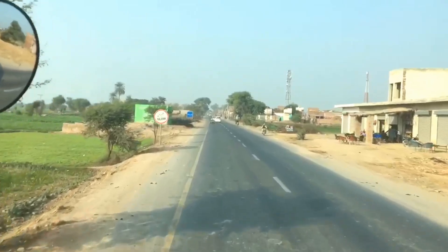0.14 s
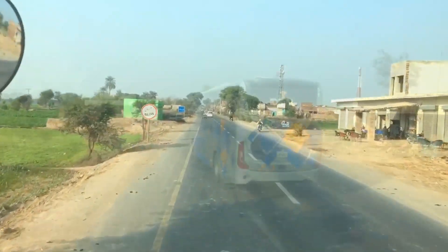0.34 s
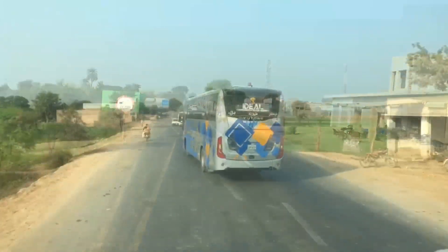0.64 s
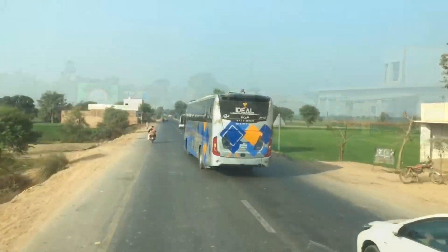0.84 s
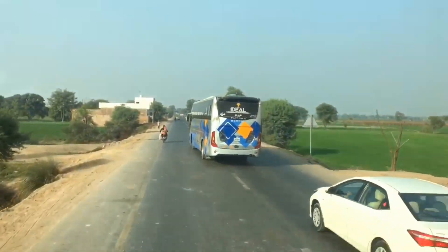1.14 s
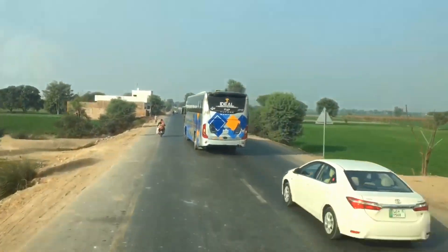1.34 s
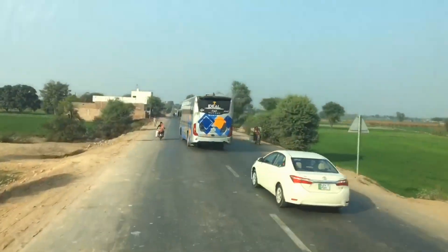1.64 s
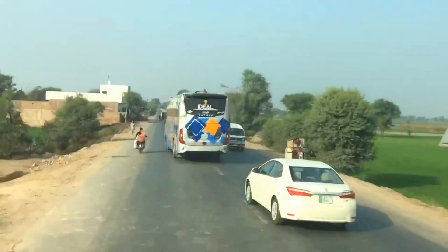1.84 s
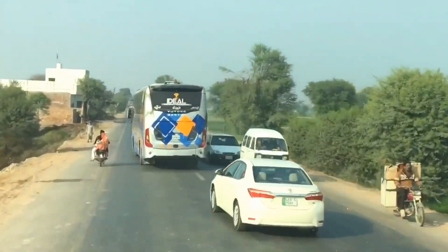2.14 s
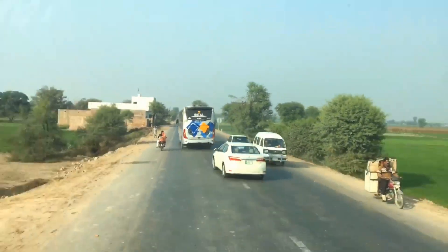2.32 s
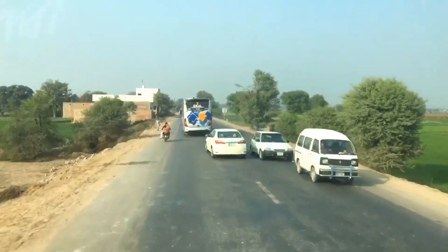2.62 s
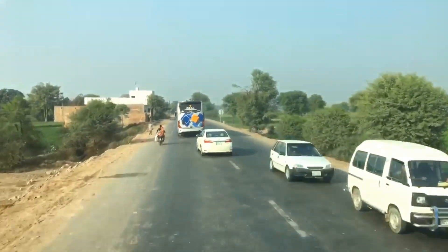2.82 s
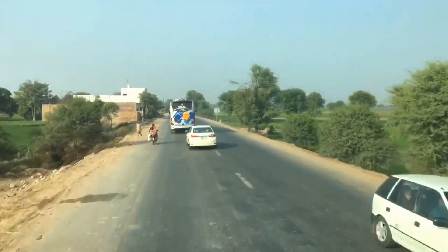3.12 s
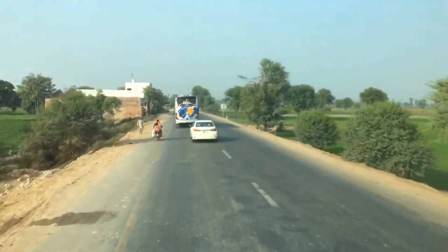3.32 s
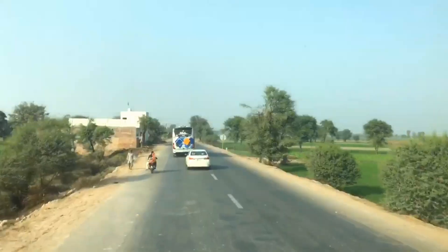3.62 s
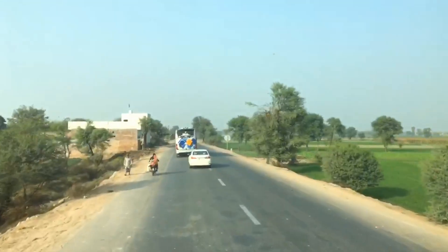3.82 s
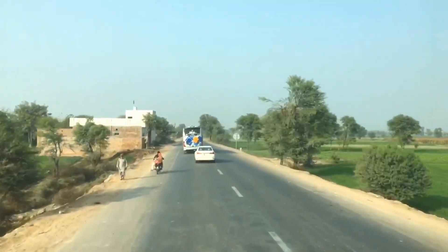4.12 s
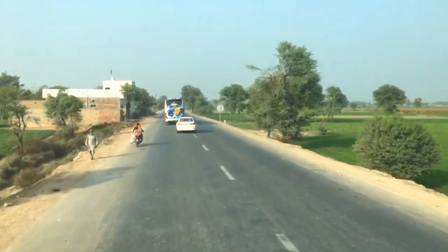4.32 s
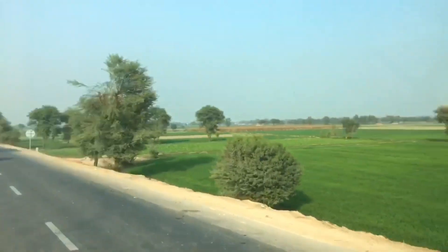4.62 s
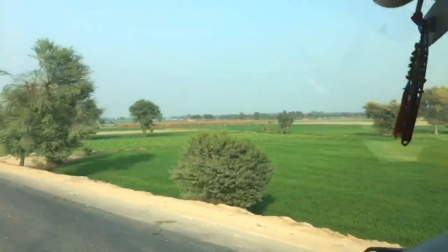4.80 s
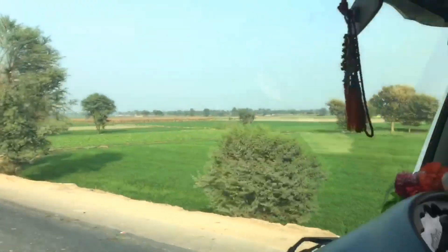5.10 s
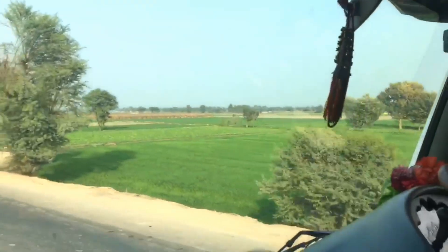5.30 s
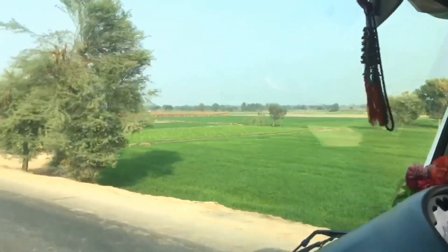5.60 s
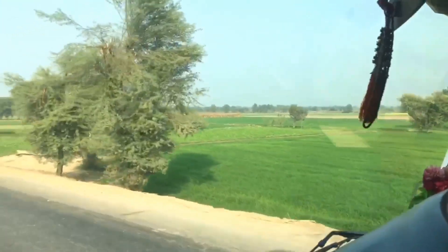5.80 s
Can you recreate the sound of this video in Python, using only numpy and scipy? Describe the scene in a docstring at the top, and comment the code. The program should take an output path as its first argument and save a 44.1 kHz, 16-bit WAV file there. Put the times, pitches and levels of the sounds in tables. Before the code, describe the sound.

A heavy diesel hum fills the cab of a truck on a country road, with the microphone inside. After a second it stops with a click, leaving a coasting engine, tyre rumble and wind while an overtaking car hisses by. The engine pulls again, knocking and setting a loose fitting clacking. Oncoming cars swish past, a rough patch brings more clacks, thuds and small squeaks, and the boom grows under faint ticks.

```python
"""Inside a truck cab on a country road

A six-cylinder diesel booms, hums and knocks over rumbling tyres and hissing wind.
It runs at steady low revs for a second and stops with a click; a second stretch, already fading
in underneath, coasts and then slowly gathers speed. Other cars swish past, bumps thud, the trim
squeaks, and there are faint dry ticks. Engine knocks, and later a rough stretch of road, set a
loose fitting clacking."""
import sys
import numpy as np
from scipy import signal
from scipy.fft import rfft, irfft
from scipy.io import wavfile
from scipy.ndimage import uniform_filter1d

SR = 44100
rng = np.random.default_rng(int(sys.argv[2]) if len(sys.argv) > 2 else 0)


def digitize_waveform(pressure):
    """Quantize a signal to 16-bit integers and store it at the path in sys.argv[1].

    Rows of a 2-D input are taken as channels; values are limited to [-1, 1].
    """
    field = np.atleast_2d(pressure).T
    bounded = np.clip(field, -1, 1)
    quanta = np.round(bounded * 32767).astype(np.int16)
    wavfile.write(sys.argv[1], SR, quanta)


N = 262395
TIME = np.arange(N) / SR
CUT_S = 0.9797  # the first stretch stops here
THROTTLE_S, THROTTLE_RISE_S, LOAD_BUILD_S = 1.757, 0.16, 1.97

# How hard each cylinder knocks, in dB, in the order they fire.
CYLINDER_KNOCK_DB = [-4.5, -8, -6.5, -4.5, -13, -6.5]
# The notes a loose fitting rings at. Each row: pitch in Hz, width in Hz, level in dB.
FITTING_RESONANCES = [(1170, 130, -4), (1500, 440, 0), (1760, 130, -1), (2164, 200, -24)]


def undb(db):
    """Turn decibels into a number to multiply by."""
    return 10 ** (np.asarray(db) / 20)


def unit(x):
    """Scale a signal so that its average power is 1."""
    return x / np.sqrt(np.mean(x ** 2))


def noise():
    """White noise: an even hiss."""
    return rng.standard_normal(N)


def drift(rate):
    """A smooth random wobble of about size 1, taking `rate` new values a second."""
    hold = int(SR / rate)
    steps = np.repeat(rng.standard_normal(N // hold + 1), hold)[:N]
    return unit(uniform_filter1d(uniform_filter1d(steps, hold), hold))


def burst(start, decay):
    """A level that jumps up and dies away."""
    age = TIME - start
    return (age >= 0) * np.exp(-np.abs(age) / decay)


def swell(peak_s, half_length_s):
    """A level that rises and falls smoothly around one moment."""
    return np.exp(-.5 * ((TIME - peak_s) / half_length_s) ** 2)


def dull(x, top_hz):
    """Cut away the treble above top_hz."""
    return signal.sosfilt(signal.ellip(8, .2, 70, top_hz, fs=SR, output="sos"), x)


def colour(x, points):
    """Shape bass and treble along a curve of (Hz, dB) points; the result has power 1."""
    hz, db = np.transpose(points)
    size = 8192
    grid_hz = np.maximum(np.fft.rfftfreq(size, 1 / SR), 1)
    gain = undb(np.interp(np.log(grid_hz), np.log(hz), db))
    # Folding the cepstrum makes the filter ring only after a sound, never before it.
    cepstrum = irfft(np.log(gain))
    cepstrum[1:size // 2] *= 2
    cepstrum[size // 2 + 1:] = 0
    response = irfft(np.exp(rfft(cepstrum)))
    return unit(irfft(rfft(x, N) * rfft(response, N), N))


def ring(x, modes):
    """Pass a sound through resonances (Hz, width Hz, dB), twice each so they stand out clearly."""
    out = 0
    for hz, width, db in modes:
        b, a = signal.iirpeak(hz, hz / width / 1.27, fs=SR)
        out = out + undb(db) * signal.lfilter(b, a, signal.lfilter(b, a, x))
    return out


def shake(force, modes):
    """A crowd of tiny contacts of the given strength makes a part ring."""
    contacts = noise()
    return ring(contacts * force, modes) / np.std(ring(contacts, modes))


def strike(blows, modes):
    """Each blow (start s, dB, decay s) rings the resonances with one hard hit and eight dying bounces."""
    force = np.zeros(N)
    for start, db, decay in blows:
        gaps_s = rng.uniform(.0025, .006, 8)
        age = np.append(0, np.cumsum(gaps_s))
        force[((start + age) * SR).astype(int)] += undb(db) * np.exp(-age / decay)
    one_hit = ring(signal.unit_impulse(SR // 10), modes)
    return ring(force, modes) / np.abs(one_hit).max()


def effort(coasting_db, opened_db, loaded_db, lag_s=0):
    """A level in dB that moves from coasting to throttle just opened, then slowly towards full load."""
    age = np.maximum(TIME - THROTTLE_S - lag_s, 0)
    throttle = np.minimum(age / THROTTLE_RISE_S, 1)
    load = 1 - np.exp(-age / LOAD_BUILD_S)
    return coasting_db + (opened_db - coasting_db) * throttle + (loaded_db - opened_db) * load


def churn(firings, repeat):
    """Noise of which the share `repeat` comes back every engine cycle; `firings` counts the firings."""
    size = 4096
    place = np.floor(firings / len(CYLINDER_KNOCK_DB) * size).astype(int) % size
    return np.sqrt(repeat) * rng.standard_normal(size)[place] + np.sqrt(1 - repeat) * noise()


def wind():
    """Air hisses at the windows, with slow gusts and a quick flutter."""
    # The tone of the hiss. Each row: frequency in Hz, level in dB.
    hiss_curve = [(800, -7.5), (2000, 11.5), (3400, 1), (4500, -3), (6200, -7), (7000, -10.5),
                  (8000, -10.5), (9500, -15.5), (11500, -40), (14000, -21.5)]
    hiss = colour(noise(), hiss_curve)
    return hiss * undb(effort(-44.5, -45.5, -48.5) + 0.45 * drift(2.2) + 1.18 * drift(24.99))


def tyres(firings):
    """Tyres rumble through the floor, louder on one rough patch of road."""
    # The tone of the rumble. Each row: frequency in Hz, level in dB.
    rumble_curve = [(16, -46), (26, -36.5), (35, -8.5), (46, -11), (70, 0), (112, 1.5), (160, -5),
                    (230, -9), (280, -15.5), (360, -10), (450, -17), (600, -23), (850, -24.5),
                    (1100, -27.5), (3000, -62.5)]
    rumble = colour(churn(firings, repeat=0.055), rumble_curve)
    rough_patch_db = 2 * swell(peak_s=3.28, half_length_s=0.28)
    return rumble * undb(effort(-23, -23, -24) + rough_patch_db + .5 * drift(14))


def passing_cars():
    """The tyres of oncoming cars swish by quickly; an overtaking car hisses for longer."""
    # Oncoming cars. Each row: loudest moment in seconds, half length in seconds, level in dB.
    passes = [(2.97, 0.075, -45.5), (3.245, 0.05, -38), (3.43, 0.075, -42.5)]
    # The tone of their swish. Each row: frequency in Hz, level in dB.
    swish_curve = [(500, -6), (1500, 7.5), (2700, 5), (4400, -6), (5200, -4), (5700, -11), (6400, -7),
                   (6950, -13), (7600, -5.5), (8400, -10.5), (9200, -11), (10700, -21), (11400, -14),
                   (12000, -23)]
    # The overtaking car's hiss through the window. Each row: pitch in Hz, width in Hz, level in dB.
    hiss_resonances = [(1160, 120, 6), (1950, 120, 2), (2615, 170, 0.5), (3040, 200, -8), (4080, 340, -10),
                       (6000, 900, -18), (7310, 420, -21)]
    nearness = sum(undb(db) * swell(peak, half_length) for peak, half_length, db in passes)
    oncoming = colour(noise(), swish_curve) * nearness * undb(drift(40.2))
    hiss = unit(ring(noise(), hiss_resonances))
    return oncoming + hiss * undb(-43.5) * swell(peak_s=0.99, half_length_s=0.21)


def dry_ticks():
    """Faint dry ticks, each with a short hollow note."""
    # Each row: start in seconds, click level in dB, click decay in seconds, note level in dB.
    ticks = [(1.773, -24.5, 0.001, -19), (4.653, -33.5, .008, -42), (4.920, -37, 0.012, -52),
             (4.990, -41, .015, -54), (5.120, -35, .002, -49), (5.160, -38.5, .005, -55),
             (5.365, -37, 0.002, -45), (5.555, -40, .008, -52), (5.697, -35, 0.007, -47),
             (5.765, -39, .006, -52)]
    # The tone of the clicks. Each row: pitch in Hz, width in Hz, level in dB.
    click_resonances = [(2000, 1500, 0), (3800, 1800, 1), (6200, 2500, -10), (9000, 1200, -11)]
    clicks = strike([tick[:3] for tick in ticks], click_resonances)
    notes = sum(undb(db) * burst(start, 0.0051) * np.sin(2 * np.pi * 660 * (TIME - start))
                for start, _, _, db in ticks)
    return clicks + notes


def trim_squeaks():
    """Rubbing trim sticks and slips, making short rough tones that slide down in pitch."""
    # Each row: start in seconds, length in seconds, starting pitch in Hz, level in dB.
    rubs = [(3.534, .026, 2580, -39.5), (3.570, .032, 2180, -36.5)]
    fall_hz_per_s = 8200
    out = 0
    for start, length, start_hz, db in rubs:
        age = np.clip(TIME - start, 0, length)
        hz = (start_hz - fall_hz_per_s * age) * (1 + .06 * drift(600))
        tone = np.sqrt(2) * np.sin(2 * np.pi * np.cumsum(hz) / SR)
        pressure = np.sin(np.pi * age / length)
        out = out + tone * pressure * undb(db + 2.3 * drift(200))
    return out


def loose_fitting():
    """A loose fitting clacks and bounces; its blunt contact gives little treble."""
    # Each row: start in seconds, strength in dB, bounce decay in seconds.
    clacks = [(1.947, -27.5, .002), (2.042, -21.5, .003), (2.140, -21.5, .002), (2.239, -21.5, .002),
              (2.320, -26.5, .003), (2.336, -25.5, .002), (2.533, -21.5, .002), (3.022, -15.5, .009),
              (3.120, -24.5, .004), (3.215, -20, .004), (3.231, -24.5, .005), (3.379, -25, .003),
              (3.523, -18, .006), (3.540, -20.5, .005), (3.698, -24, .009), (3.7215, -15.5, .008)]
    blunt = signal.butter(3, 2300, fs=SR, output="sos")
    return signal.sosfilt(blunt, strike(clacks, FITTING_RESONANCES))


def bumps():
    """Bumps in the road jolt the cab and make its panels thud."""
    # Each row: start in seconds, level in dB, decay in seconds.
    jolts = [(0.940, -24, 0.038), (1.888, -20, 0.028), (3.596, -26, 0.029), (3.701, -25, 0.026)]
    # How the panels ring. Each row: pitch in Hz, width in Hz, level in dB.
    panel_resonances = [(119, 98, -8), (210, 135, 0), (380, 50, 3), (924, 120, -11.5), (1490, 180, -19)]
    force = sum(undb(db) * burst(start, decay) for start, db, decay in jolts)
    return shake(force, panel_resonances)


def engine_whine():
    """The engine bay rings, clearest off the throttle; each note comes and goes on its own."""
    # Each row: pitch in Hz, width in Hz, level in dB.
    bay_resonances = [(873, 44, 7.5), (1258, 73, 7), (1658, 32, 6), (1985, 62, 1), (2475, 120, -3),
                      (2636, 61, -5), (3395, 54, -4), (4140, 110, -9.5), (6130, 380, -21.5),
                      (7400, 300, -21.5), (8150, 400, -28)]
    whine = sum(ring(noise(), [mode]) * undb(2.0 * drift(5.9)) for mode in bay_resonances)
    return unit(whine) * undb(effort(-44, -49, -56.5))


def clatter(firings, scatter_db, decay, steady, repeat):
    """Each firing shakes the engine block briefly, over the steady churn of gears and valves."""
    index = np.floor(firings).astype(int)
    chance = rng.standard_normal(1024)[index % 1024]
    cylinder_db = np.array(CYLINDER_KNOCK_DB)[index % len(CYLINDER_KNOCK_DB)]
    blows = undb(cylinder_db + scatter_db * chance) * np.exp(-(firings % 1) / decay)
    return churn(firings, repeat) * (steady + blows)


def dashboard_buzz(firings):
    """The firings make the dashboard buzz, harder and with a different tone under load."""
    # How the dashboard rings. Each row: pitch in Hz, width in Hz, level in dB.
    dash_resonances = [(822, 62, -4), (915, 50, -2.5), (1208, 120, -1), (1411, 55, -1), (1505, 55, -2.5),
                       (1571, 51, 2), (1681, 80, -2), (2156, 110, -9.5)]
    # How much each of those rows changes at full load, in dB.
    load_change_db = [-1, -0.5, -1, -0.5, 5.5, -1, -1, -8.5]
    shaking = clatter(firings, scatter_db=2.5, decay=0.29, steady=0.32, repeat=0.28)
    buzz = sum(ring(shaking, [mode]) * undb(effort(0, 0, db))
               for mode, db in zip(dash_resonances, load_change_db))
    return unit(buzz) * undb(effort(-50, -37, -39.5))


def engine_knock(firings):
    """Once every engine cycle, a knock of uneven strength rings the loose fitting."""
    strength = undb(effort(-57, -37, -46.5) + 2.5 * drift(23.0))
    pulse = np.exp(-(firings % len(CYLINDER_KNOCK_DB)) / 0.26)
    return shake(strength * pulse, FITTING_RESONANCES)


def engine_hum(firings, tones, waver):
    """Unequal cylinders make wavering tones at multiples of the engine cycle (two turns, six firings)."""
    cycle = 2 * np.pi * firings / len(CYLINDER_KNOCK_DB)
    out = 0
    for multiple, db in tones:
        angle = multiple * cycle + 2 * np.pi * rng.random()
        tone = (1 + waver * drift(7)) * np.cos(angle) + waver * drift(7) * np.sin(angle)
        out = out + undb(db) * tone
    return np.sqrt(2) * out


def cruising_engine():
    """Steady low revs match a resonance of the cab: a heavy boom, thin gear whine and dull clatter."""
    # The hum and gear whine. Each row: multiple of the engine cycle, level in dB.
    hum_tones = [(12, -44), (14, -32), (15, -30.5), (16, -25), (18, -25.5), (20, -42.5), (22, -40),
                 (24, -44.5), (26, -47.5), (28, -48), (30, -41.5), (32, -36.5), (34, -47.5), (51, -52),
                 (57, -51.5), (68, -59), (84, -41), (92, -58), (113, -61), (123, -53), (129, -48),
                 (159, -65)]
    # The tone of the clatter. Each row: frequency in Hz, level in dB.
    clatter_curve = [(25, -34.5), (45, 0), (75, 3.5), (105, 2), (150, -10), (230, -12.5), (400, -19.5),
                     (600, -19.5), (780, -21.5), (1100, -26), (1500, -29.5), (2300, -34), (3000, -44.5),
                     (5000, -52.5), (8000, -62.5), (12000, -70.5)]
    firing_hz, hum_fall_db_per_s, fade_s = 52.8, 3.5, .004
    firings = firing_hz * (TIME - CUT_S)
    boom = np.sqrt(2) * np.cos(2 * np.pi * firings - np.pi / 6) * undb(-13.0 + 0.4 * drift(7.5))
    shaking = clatter(firings, scatter_db=-5.0, decay=0.26, steady=1.2, repeat=0.41)
    block = colour(shaking, clatter_curve) * undb(-21.0)
    hum = engine_hum(firings, hum_tones, waver=0.28) * undb(0.4 - hum_fall_db_per_s * TIME)
    # All but the boom dies away just before the cut.
    return boom + (hum + block) * np.clip((CUT_S - TIME) / fade_s, 0, 1)


def pulling_firings():
    """A running count of cylinder firings as the revs dip slightly and then climb."""
    # Engine speed. Each row: time in seconds, firings per second.
    revs = [(0, 61.5), (1.5, 61.8), (2.2, 61.05), (2.6, 61.13), (3, 61.58), (3.5, 62.29), (4, 63.12),
            (4.5, 64.08), (5, 65.15), (5.5, 66.23), (5.85, 66.95)]
    times, firing_hz = np.transpose(revs)
    firings = np.cumsum(np.interp(TIME, times, firing_hz)) / SR
    return firings - np.interp(2.139, TIME, firings)  # a cycle starts at 2.139 s


def pulling_engine(firings):
    """The engine coasts, then takes load; the cab's boom wavers at first, then steadies and grows."""
    # The hum. Each row: multiple of the engine cycle, level in dB.
    hum_tones = [(8, -45.5), (9, -40.5), (10, -44), (14, -48), (15, -43.5), (16, -40), (18, -40),
                 (19, -44.5), (21, -39), (22, -45), (24, -39), (27, -49.5), (28, -48), (30, -46.5),
                 (32, -43), (35, -51), (38, -48), (42, -49), (44, -51.5), (47, -53), (52, -57), (93, -57.5),
                 (108, -56.5)]
    # The tone of the engine block's clatter. Each row: frequency in Hz, level in dB.
    block_curve = [(300, -19.5), (680, -8), (860, 0), (1000, -11.5), (1200, 0.5), (1380, 2.5), (1580, -1.5),
                   (1750, -9), (1900, -4.5), (2200, -11), (2700, -11), (3200, -11.5), (5000, -30),
                   (10000, -74)]
    full_boom_db = -12.5
    boom_db = effort(-27.5, -19, full_boom_db, lag_s=0.079)
    waver_db = effort(3, 0.35, 0.35) * drift(11)
    boom = np.sqrt(2) * np.cos(2 * np.pi * (firings + 0.11)) * undb(boom_db + waver_db)
    octave = engine_hum(firings, [(12, 0)], waver=0.17) * undb(effort(-35.5, -41.5, -34))
    hum = engine_hum(firings, hum_tones, waver=0.19) * undb(0.38 * (boom_db - full_boom_db) + 0.7)
    shaking = clatter(firings, scatter_db=5.0, decay=0.42, steady=1.0, repeat=.3)
    block = colour(shaking, block_curve) * undb(effort(-43.5, -39.5, -43.5))
    return boom + octave + hum + block + dashboard_buzz(firings) + engine_knock(firings) + engine_whine()


def scene():
    """Everything as heard from the seat; the first stretch stops in mid-swing, with a click."""
    top_hz = 11900
    first = dull(cruising_engine(), top_hz) * (TIME < CUT_S)
    firings = pulling_firings()
    fade_in = np.interp(TIME, (0.12, 0.92), (0, 1))
    driving = (pulling_engine(firings) + tyres(firings) + wind()) * fade_in
    events = passing_cars() + loose_fitting() + bumps() + trim_squeaks() + dry_ticks()
    second = dull(driving + events, top_hz)
    return (first + second)[None]


def record(dry):
    """Take off the very highest treble."""
    return dull(dry, top_hz=16000)


dry = scene()
out = record(dry)
digitize_waveform(out)
```